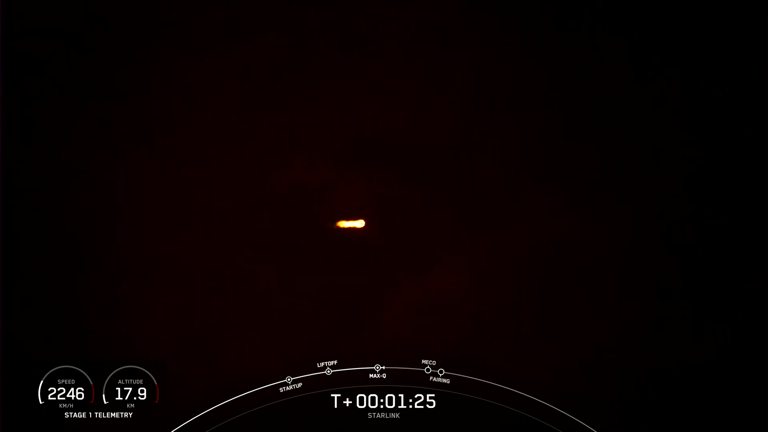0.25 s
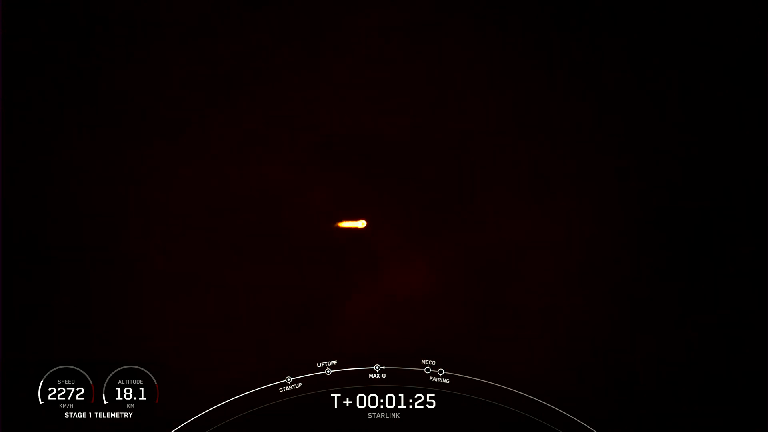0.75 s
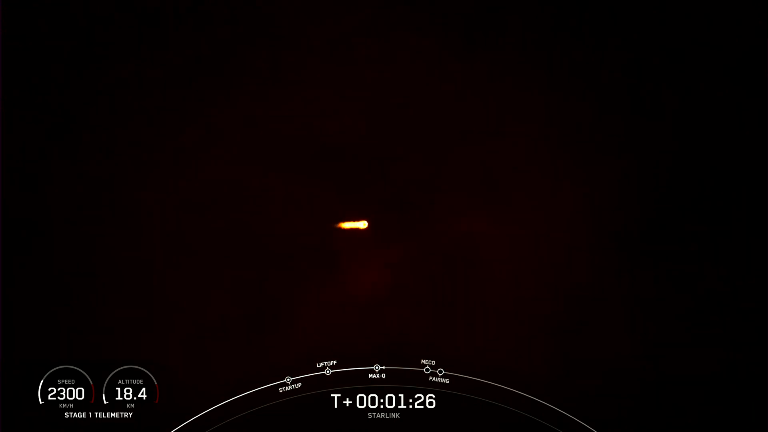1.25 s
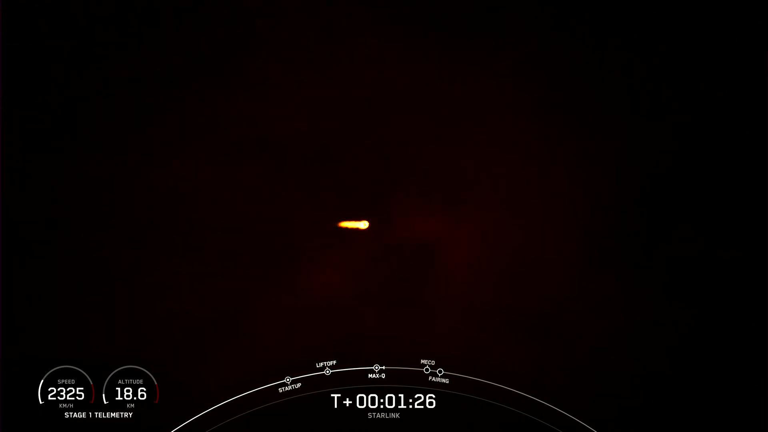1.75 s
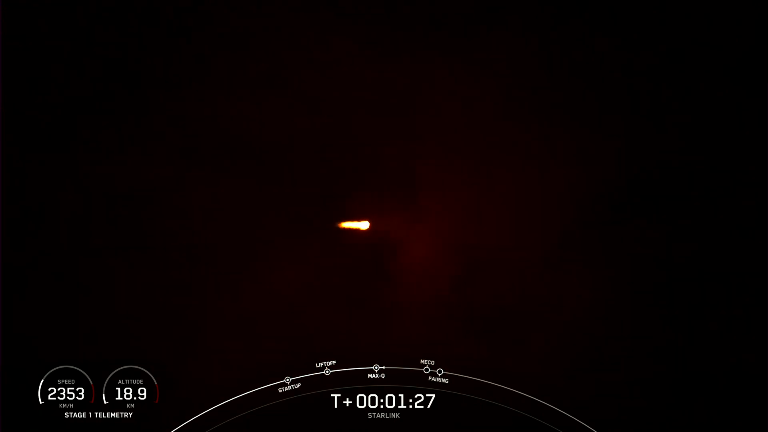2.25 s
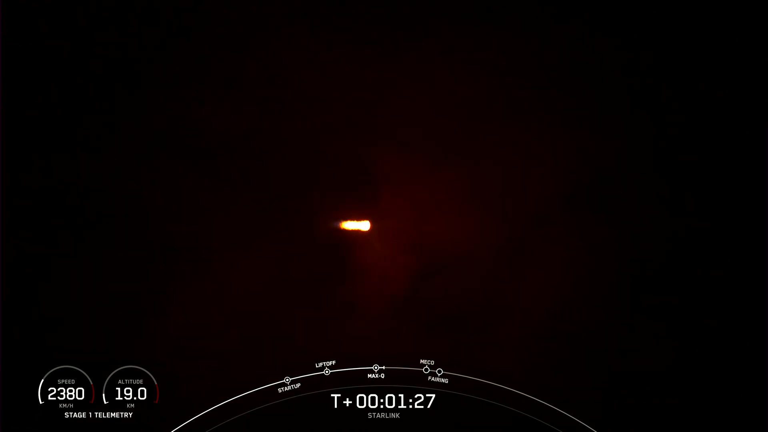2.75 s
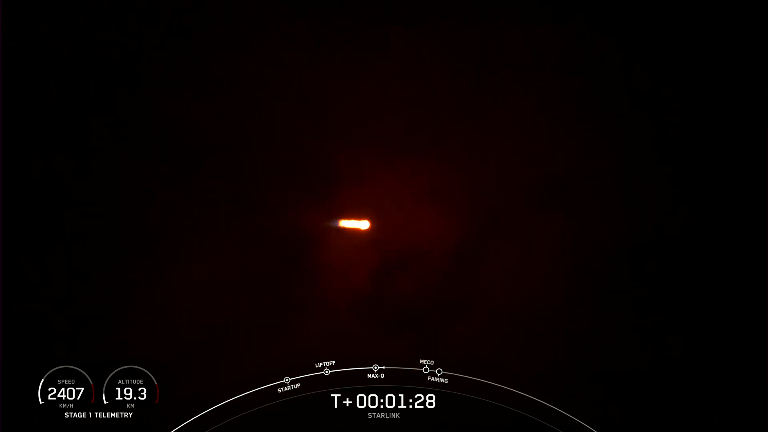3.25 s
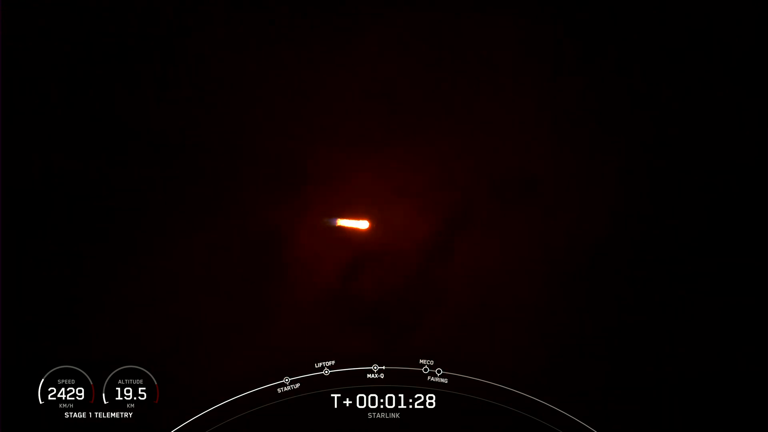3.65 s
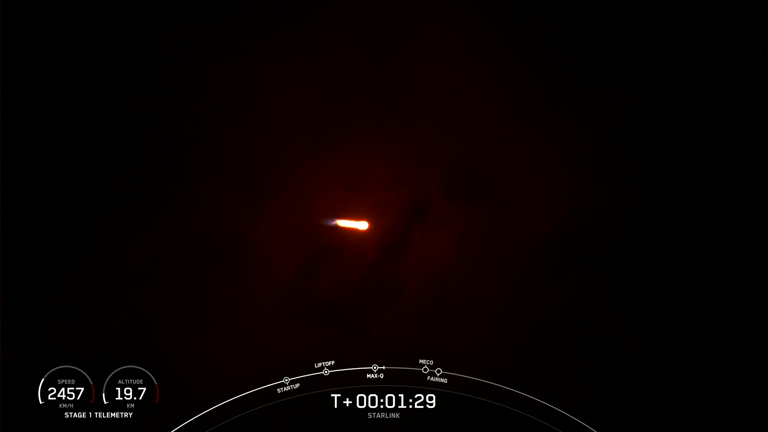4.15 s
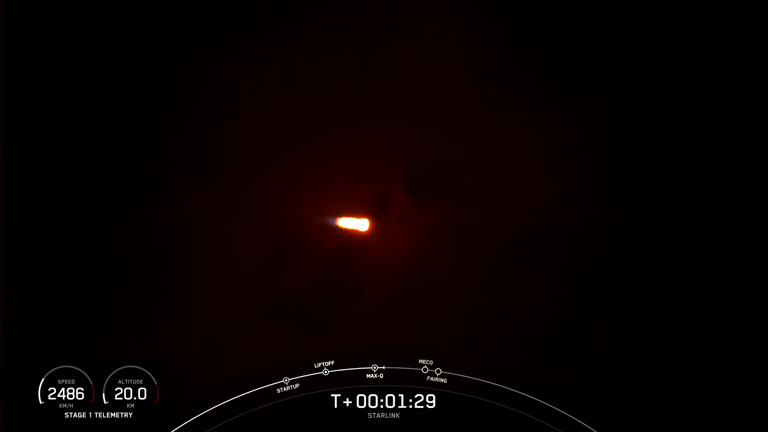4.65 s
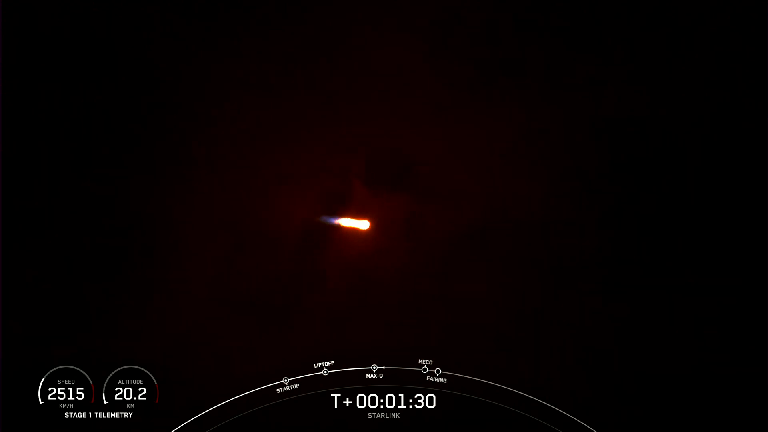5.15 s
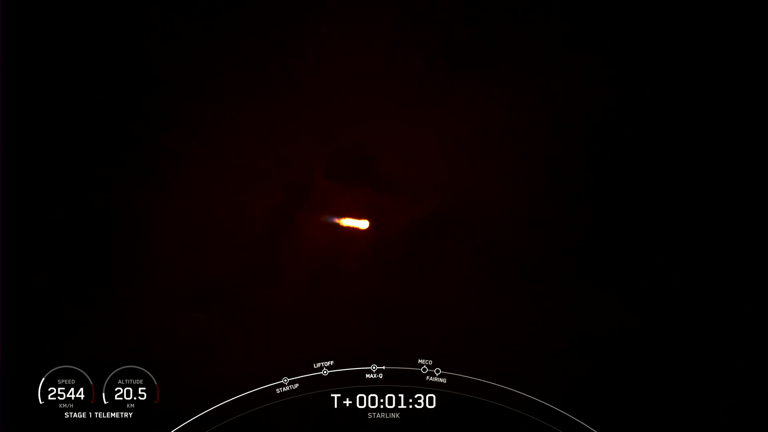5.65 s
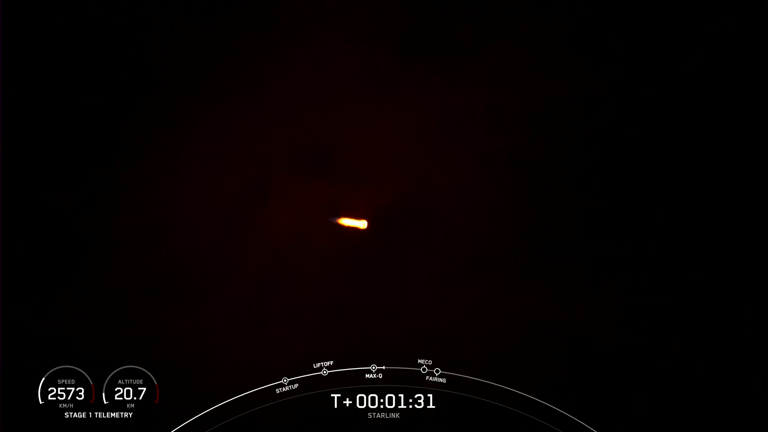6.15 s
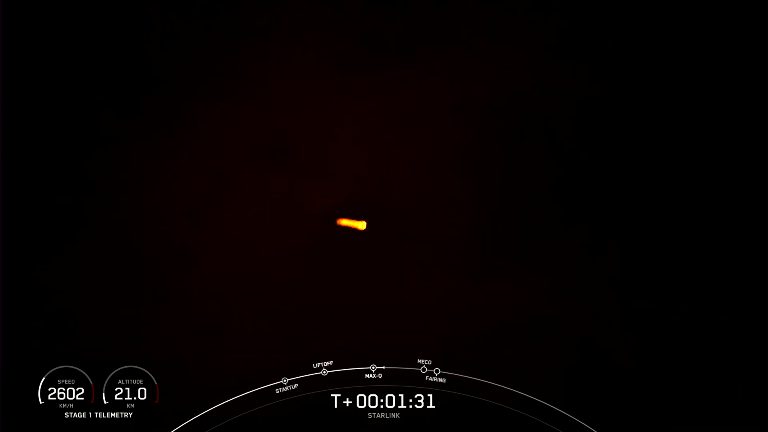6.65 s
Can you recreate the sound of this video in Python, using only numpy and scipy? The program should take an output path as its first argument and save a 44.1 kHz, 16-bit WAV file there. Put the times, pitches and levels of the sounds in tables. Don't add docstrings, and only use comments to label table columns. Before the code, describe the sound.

At night a rocket climbs far away. Its exhaust arrives as a very deep, uneven rumble with brief lulls and soft booms. After about two and a half seconds, thuds and rounded pops crowd in, strongest past four seconds, then thin out. A faint high hiss of venting gas and a thin machine whine stay near the outdoor microphone, dipping whenever the loudest bass makes the level clamp down.

```python
import sys
import numpy as np
from scipy import signal
from scipy.fft import rfft, irfft
from scipy.io import wavfile
from scipy.ndimage import uniform_filter1d

SR = 44100
rng = np.random.default_rng(int(sys.argv[2]) if len(sys.argv) > 2 else 0)


def natural_amplitude(level_db):
    exponent = np.asarray(level_db, float) / 20
    return 10 ** exponent


def bounce(signal):
    frames = np.transpose(np.atleast_2d(signal))
    limited = np.clip(frames, -1, 1)
    pcm = np.round(limited * 32767).astype(np.int16)
    wavfile.write(sys.argv[1], SR, pcm)


N = 304731
CONTROL_S = np.arange(0, 6.92, .002)


def level(x, db):
    return x * natural_amplitude(db) / np.sqrt(np.mean(x ** 2))


def colour(x, spectrum):
    points_hz, points_db = np.transpose(spectrum)
    f = np.maximum(np.arange(N // 2 + 1) * SR / N, 1)
    gain = natural_amplitude(np.interp(np.log(f), np.log(points_hz), points_db))
    in_band = f < points_hz[-1]
    return level(irfft(rfft(x) * gain * in_band, N), 0)


def even(x, span_s, share):
    power = uniform_filter1d(x ** 2, int(span_s * SR))
    return level(x / power ** (share / 2), 0)


def walk(rate_hz):
    hold = int(SR / rate_hz)
    steps = np.repeat(rng.standard_normal(N // 500), hold)[:N]
    x = uniform_filter1d(uniform_filter1d(steps, hold), hold)
    return x / x.std()


def shocks(rate_hz, scatter_db):
    arrival, size = rng.random((2, N))
    jumps = natural_amplitude(-scatter_db * np.log(1 - size)) * np.sign(rng.standard_normal(N))
    return (arrival < rate_hz / SR) * jumps


def curve(rows):
    s, *columns = np.transpose(rows)
    return [np.interp(np.arange(N) / SR, s, column) for column in columns]


def smooth(control):
    return np.interp(np.arange(N) / SR, CONTROL_S, control)


def bell(s, width_s):
    return np.exp(-.5 * ((CONTROL_S - s) / width_s) ** 2)


# (frequency [Hz], level [dB])
VENT_SPECTRUM = [(800, -30), (1300, -4), (1800, -5), (2100, -3), (2500, -2), (2680, 1), (2850, -3),
                 (3300, -13), (4200, -21), (5500, -27), (7000, -29), (10000, -36), (12500, -41.5),
                 (15400, -46), (15700, -70)]


def vent_hiss():
    vent = rng.standard_normal(N) + 1.2 * shocks(270, scatter_db=3.5)
    hiss = level(colour(vent, VENT_SPECTRUM), -59.5)
    strongest_band = signal.lfilter(*signal.iirpeak(2500, 2.5, SR), hiss)
    return hiss + strongest_band * (natural_amplitude(walk(12)) - 1)


# (frequency [Hz], bandwidth [Hz], level [dB])
WHINE_LINES = [(2142, 6, -71.5), (2160, 6, -76), (2182, 7, -78)]


def machine_whine():
    whine = np.zeros(N)
    for hz, width_hz, db in WHINE_LINES:
        line = signal.lfilter(*signal.iirpeak(hz, hz / width_hz, SR), rng.standard_normal(N))
        whine = whine + level(line, db)
    return whine


# (frequency [Hz], level [dB])
SHAKE_SPECTRUM = [(9, -24), (20, -13), (30, -6), (40, 0), (50, -4), (62, -18), (95, -60)]


def ground_shake(shake_db, lull_db):
    shake = even(colour(rng.standard_normal(N), SHAKE_SPECTRUM), .12, .5)
    return shake * natural_amplitude(shake_db - 1.5 + .5 * lull_db)


# (frequency [Hz], level [dB])
CRACKLE_SPECTRUM = [(2400, -15), (3200, 0.5), (4000, -0.5), (5000, -7.5), (6200, -11), (9000, -70)]


def crackle(crackle_db, lift_db, turbulence):
    snaps = colour(shocks(3000, scatter_db=1.5), CRACKLE_SPECTRUM) * turbulence
    return natural_amplitude(crackle_db + 0.13 * lift_db - 1.4 * walk(13)) * snaps


# (frequency [Hz], level [dB])
ROAR_SPECTRUM = [(200, -29), (330, -6), (460, 0.5), (620, -5), (740, -3), (1000, -5.5), (1400, -15.5),
                 (2000, -23.5), (3000, -75)]


def roar(roar_db, lift_db, turbulence):
    noise = level(colour(shocks(2500, scatter_db=1.5), ROAR_SPECTRUM) * turbulence, 0)
    return natural_amplitude(roar_db + lift_db + .6 * walk(7.2)) * noise


# (time [s], peak level after the limiter [dB])
POP_FRONTS = [(2.649, -67), (3.024, -36), (3.184, -38), (3.585, -39), (3.913, -33.5), (4.076, -34.5),
              (4.144, -33.5), (4.19, -28), (4.375, -32), (4.435, -31.5), (4.697, -42.5), (4.897, -35)]


def pops():
    pop_hz, pop_s = 281, 0.00258
    t = np.arange(-600, 600) / SR
    rounded_front = -np.cos(2 * np.pi * pop_hz * t) * np.exp(-.5 * (t / pop_s) ** 2)
    fronts = np.zeros(N)
    for s, db in POP_FRONTS:
        fronts[int((s + 2 * pop_s) * SR)] = natural_amplitude(db - 0.5)
    return signal.fftconvolve(fronts, rounded_front, "same")


# (centre time [s], width [s], level after the limiter [dB], lift of the roar [dB])
BOOM_SWELLS = [(0.124, 0.027, -43.5, 0), (0.269, 0.042, -42, 2), (0.433, 0.032, -48, 0),
               (0.481, 0.05, -39, -2.5), (0.569, 0.034, -40, 2.5), (0.748, 0.036, -44, 4),
               (1.034, 0.037, -41, -1), (1.197, 0.042, -52, 2), (1.283, 0.03, -43.5, -0.5),
               (1.556, 0.029, -41.5, 1), (1.89, 0.027, -45, 0), (2.003, 0.13, -46.5, -2.5),
               (2.273, 0.11, -48.5, -0.5), (2.524, 0.087, -42, -0.5), (2.656, 0.035, -44, 1),
               (3.021, 0.12, -44.5, 4), (3.221, 0.18, -40.5, 0), (3.404, 0.039, -42.5, -1),
               (3.586, 0.048, -37, 2.5), (3.644, 0.11, -45.5, -0.5), (3.867, 0.02, -42, 2.5),
               (3.919, 0.015, -44, 3), (4.109, 0.044, -39, 4), (4.196, 0.02, -33, 6),
               (4.332, 0.013, -30, -5), (4.44, 0.086, -39.5, -1), (4.707, 0.033, -33, 4),
               (4.943, 0.11, -37.5, 2), (5.263, 0.071, -42, 0.5), (6.008, 0.046, -45, -1.5)]


def boom_levels(mutter_db):
    trim_db, narrowing = -1, 0.27
    power, lift_db = 0, 0
    for s, width_s, db, roar_lift_db in BOOM_SWELLS:
        swell = bell(s, narrowing * width_s)
        power = power + natural_amplitude(2 * (db + trim_db)) * swell
        lift_db = lift_db + roar_lift_db * swell
    boom_db = 10 * np.log10(natural_amplitude(2 * mutter_db) + smooth(power))
    return boom_db, smooth(lift_db)


# (frequency [Hz], level [dB])
BOOM_SPECTRUM = [(90, -37.5), (150, 1), (210, -0.5), (310, -8), (420, -13.5), (600, -29), (1200, -93.5)]


def boom(boom_db):
    return natural_amplitude(boom_db) * even(colour(shocks(900, scatter_db=1.5), BOOM_SPECTRUM), .04, .6)


# (frequency [Hz], level [dB])
THUD_SPECTRUM = [(60, -28), (100, -1), (140, 0), (180, -11.5), (260, -23), (500, -96.5)]


def thud(deep_db, boom_db):
    noise = even(colour(shocks(500, scatter_db=3.0), THUD_SPECTRUM), 0.13, 0.86)
    return noise * natural_amplitude(0.33 * deep_db + 0.64 * boom_db + 0.32)


# (centre time [s], width [s], depth [dB])
LULL_DIPS = [(0.172, 0.022, 0), (0.267, 0.019, 9), (0.475, 0.059, 6.5), (0.555, 0.031, 1),
             (0.696, 0.031, 8.5), (0.914, 0.014, 4), (1.463, 0.089, 2), (1.537, 0.026, 13),
             (1.782, 0.029, 8), (1.848, 0.036, 3.5), (1.974, 0.03, 7.5), (2.091, 0.035, 4),
             (2.245, 0.026, 5), (2.419, 0.17, 7.5), (2.608, 0.064, 5), (2.734, 0.077, 4),
             (3.127, 0.012, 10.5), (3.784, 0.063, 14), (4.019, 0.13, 6.5), (4.135, 0.018, 7),
             (4.552, 0.08, 9.5), (4.871, 0.022, 4.5), (5.175, 0.073, 8.5), (5.38, 0.2, 3.5),
             (5.909, 0.046, 3), (6.006, 0.043, 0.5), (6.242, 0.27, 3.5), (6.403, 0.062, 2),
             (6.713, 0.069, 5), (6.865, 0.02, 14.5)]


def lulls_db():
    deepening, narrowing = 1.54, 0.36
    return smooth(sum(-deepening * db * bell(s, narrowing * width_s) for s, width_s, db in LULL_DIPS))


# (frequency [Hz], level [dB])
RUMBLE_SPECTRUM = [(9, -43), (15, -41), (38, -20.5), (55, -1.5), (72, 2), (90, -3.5), (110, -14),
                   (150, -36.5), (300, -98)]


def deep_rumble(deep_db):
    return natural_amplitude(deep_db) * even(colour(rng.standard_normal(N), RUMBLE_SPECTRUM), .07, 0.32)


# (time [s], rumble and ground shake after the limiter [dB, dB],
# roar and crackle before it [dB, dB])
PLUME_LEVELS = [(0, -34, -61, -51, -71.5), (.35, -31.5, -40, -52, -71), (1.1, -31.5, -43.5, -54.5, -73),
                (1.9, -31, -41.5, -52.5, -72), (2.5, -31.5, -39.5, -53.5, -70.5),
                (2.85, -34, -36, -52, -70), (3.3, -35.5, -39, -51, -71.5), (3.8, -32, -37.5, -51, -68),
                (4.3, -34.5, -36.5, -51.5, -66.5), (4.9, -32, -46, -51, -68.5),
                (5.4, -33, -40.5, -53.5, -71.5), (5.8, -34, -44, -52, -72.5), (6.3, -33.5, -47, -56.5, -72),
                (6.91, -33, -49, -55, -70.5)]


def exhaust():
    rumble_db, shake_db, roar_db, crackle_db = curve(PLUME_LEVELS)
    turbulence = natural_amplitude(.5 * walk(13))
    lull_db = lulls_db()
    deep_db = rumble_db + lull_db
    mutter_db = rumble_db - 15 + 0.23 * lull_db + walk(14)
    boom_db, lift_db = boom_levels(mutter_db)
    lows = deep_rumble(deep_db) + thud(deep_db, boom_db) + boom(boom_db)
    lows = lows + pops() + ground_shake(shake_db, lull_db)
    lows = lows / natural_amplitude(limiter_db())
    return lows + roar(roar_db, lift_db, turbulence) + crackle(crackle_db, lift_db, turbulence)


def scene():
    return (vent_hiss() + machine_whine() + exhaust())[None]


# (time [s], gain reached [dB])
LIMITER_BITES = [(.335, -2), (.67, -2.5), (.755, -3), (1.21, -2), (1.74, -1.5), (2.15, 2), (2.28, -4),
                 (2.565, -8.5), (2.8, -6), (2.9, -7.5), (3.09, -5.5), (3.282, -9), (3.47, -6), (3.6, -8.5),
                 (3.7, -8.5), (3.873, -12.5), (3.97, -6), (4.05, -6), (4.2, -6.5), (4.33, -8.5), (4.43, -9),
                 (4.471, -10.5), (4.6, -8.5), (4.72, -8.5), (4.79, -8), (4.92, -6.5), (4.97, -8),
                 (5.285, -4.5)]


def limiter_db():
    bite_s, recover_db_per_s = 0.024, 26.5
    gain_db = 0
    for s, db in LIMITER_BITES:
        since = CONTROL_S - s
        onset = np.clip(since / bite_s + .5, 0, 1)
        gain_db = np.minimum(gain_db, onset * (db + recover_db_per_s * since))
    return smooth(gain_db)


def band_limit(x):
    return signal.sosfilt(signal.butter(12, 15500, fs=SR, output="sos"), x)


def record(dry):
    ceiling = .085
    x = dry * natural_amplitude(limiter_db())
    x = x / (1 + np.abs(x / ceiling) ** 5) ** (1 / 5)
    return band_limit(x)


dry = scene()
out = record(dry)
bounce(out)
```